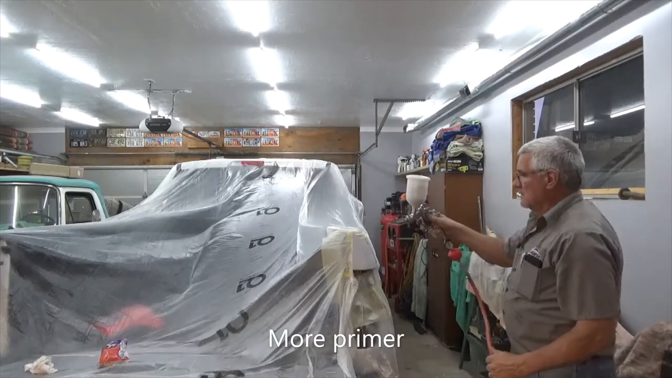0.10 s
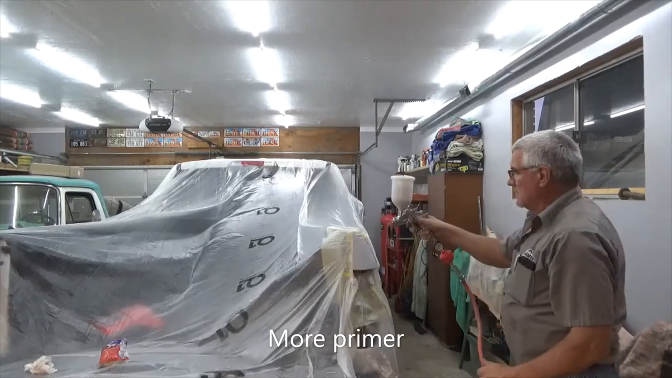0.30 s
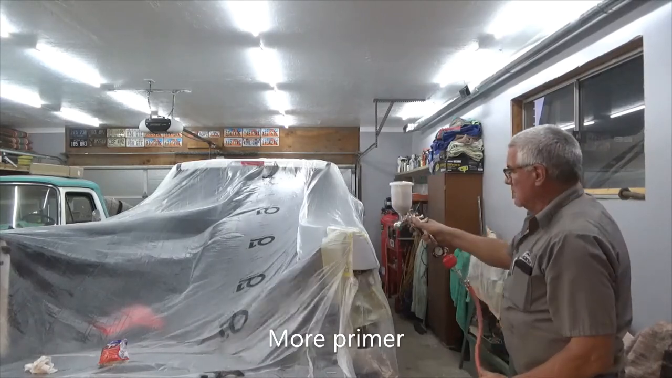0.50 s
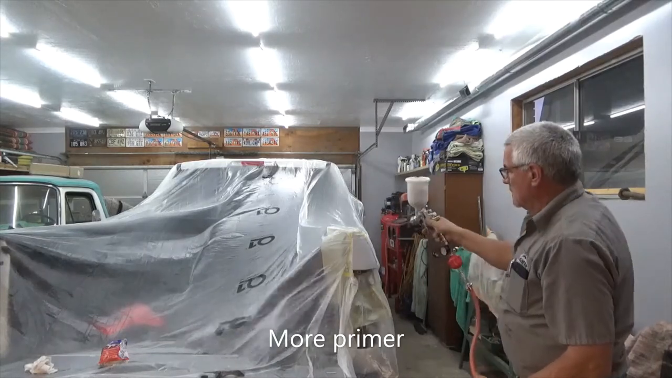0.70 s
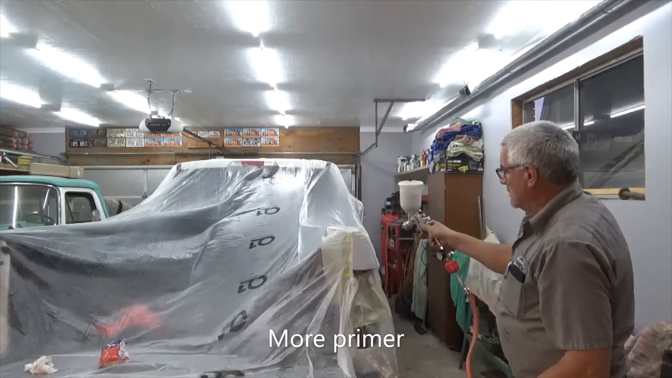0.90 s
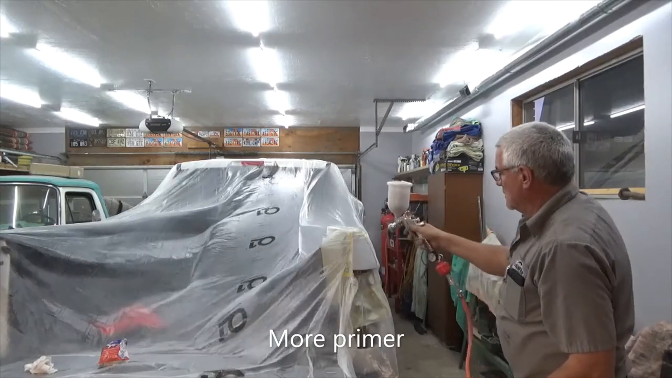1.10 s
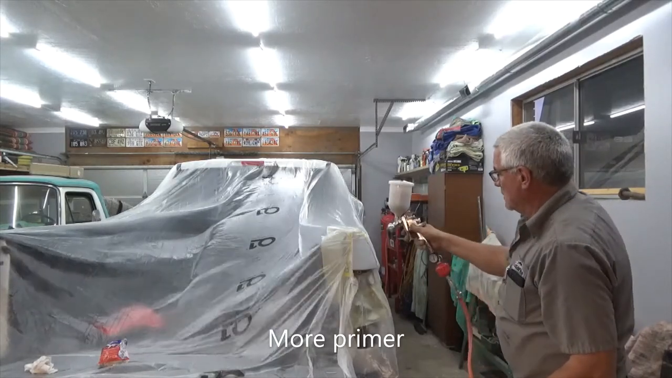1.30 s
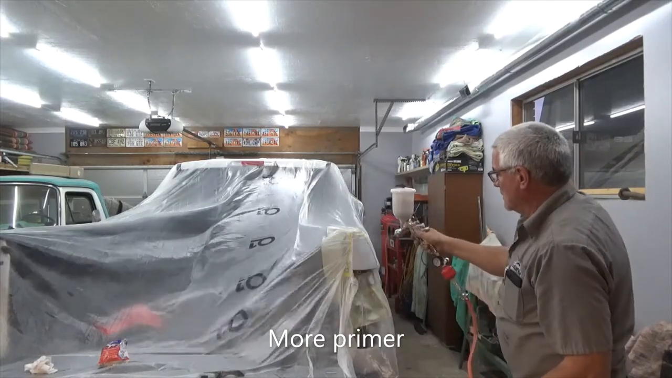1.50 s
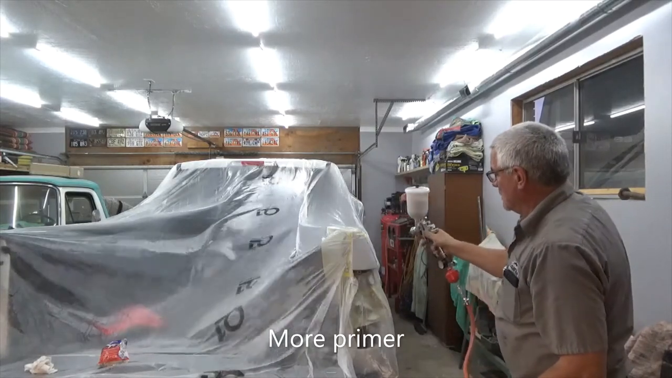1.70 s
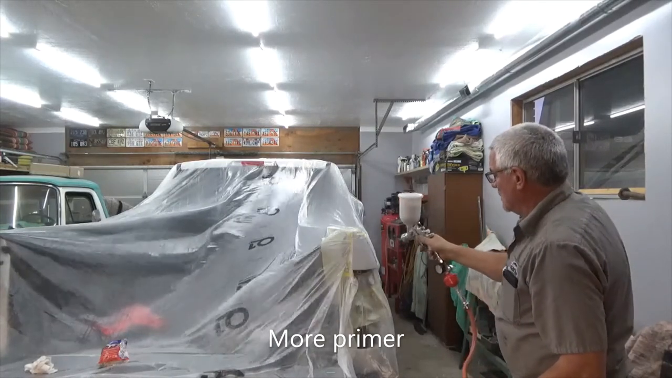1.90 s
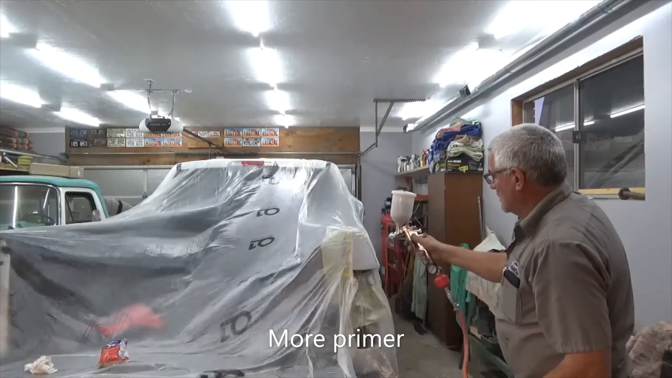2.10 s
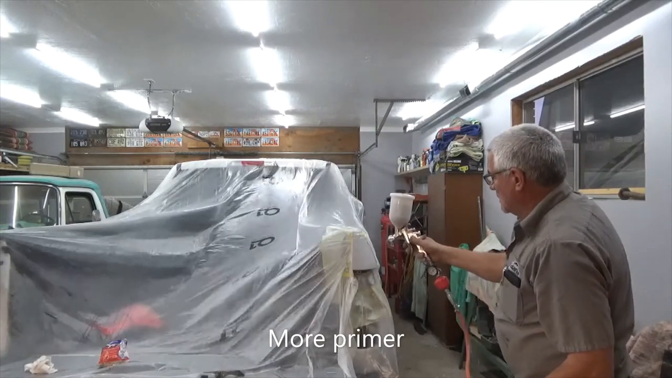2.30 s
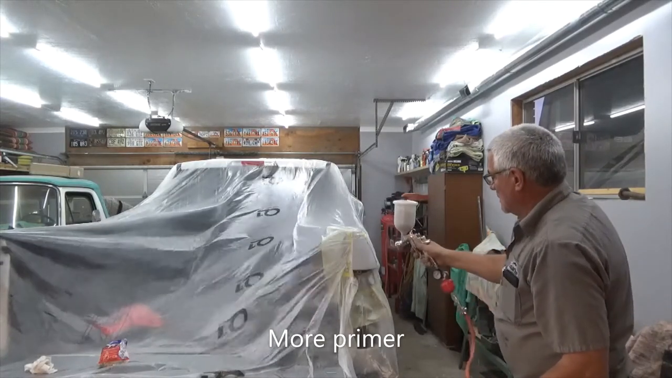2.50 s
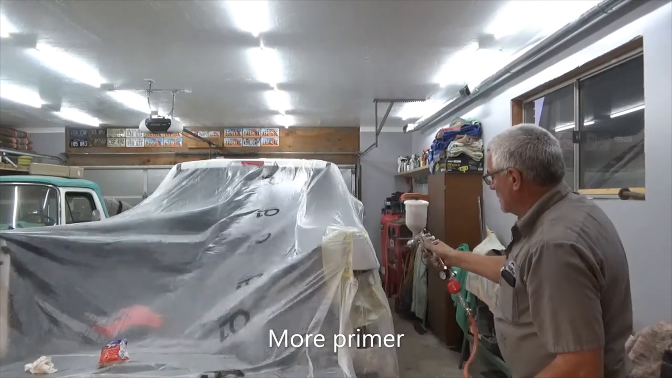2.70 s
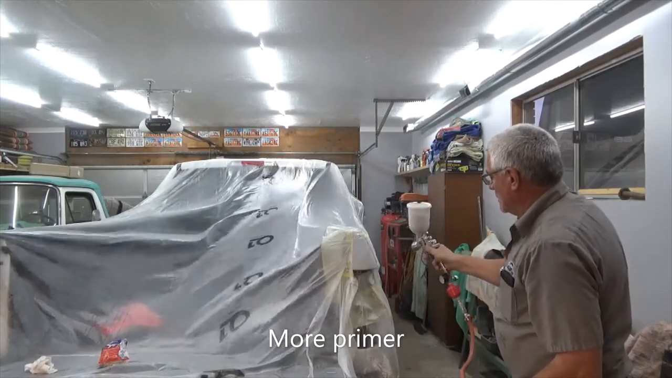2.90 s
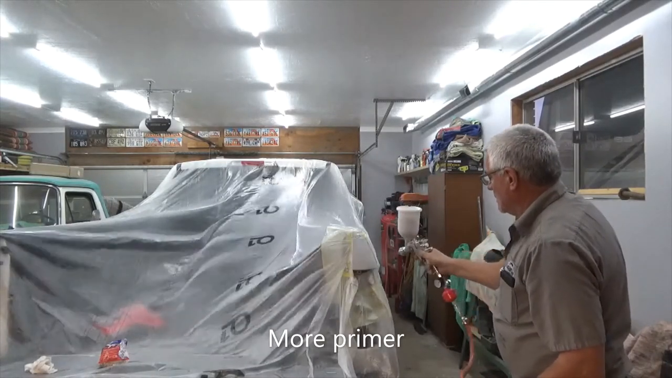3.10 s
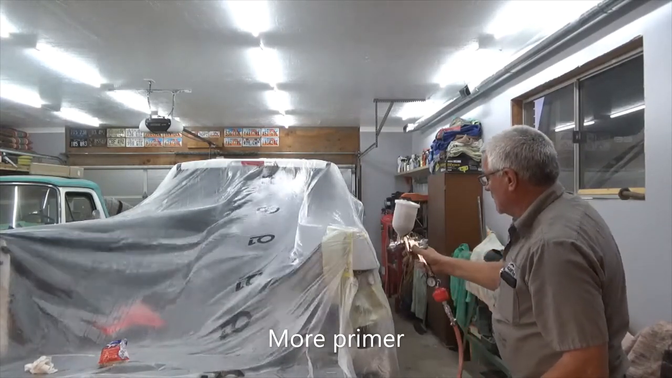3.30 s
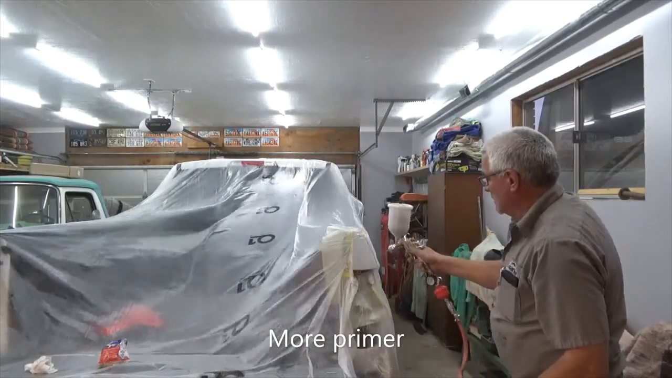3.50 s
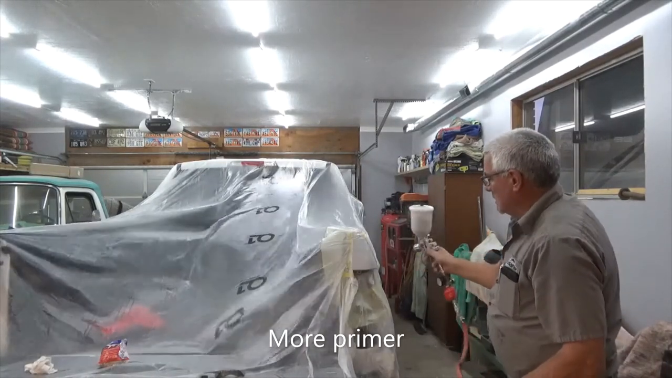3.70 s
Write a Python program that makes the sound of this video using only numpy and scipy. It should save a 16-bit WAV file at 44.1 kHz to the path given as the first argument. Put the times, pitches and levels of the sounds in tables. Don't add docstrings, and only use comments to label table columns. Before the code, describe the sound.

A spray gun hisses seven times in a hard, reverberant garage, starting near 0.2, 0.8, 1.25, 1.75, 2.2, 2.85 and 3.35 seconds. Each burst lasts about a quarter to half a second: a sharp bright surge, a steadier treble jet, an abrupt stop and short room ring. A distant compressor rumbles throughout with wavering low hum and soft airy wash, ducked by the microphone's limiter at each surge.

```python
import sys
import numpy as np
from scipy import signal
from scipy.io import wavfile
from scipy.ndimage import uniform_filter1d

SR = 44100
rng = np.random.default_rng(int(sys.argv[2]) if len(sys.argv) > 2 else 0)


def nominal_scale(level):
    x = np.asarray(level, float) / 20
    return 10 ** x


def wrap_up_sound(samples):
    columns = np.atleast_2d(samples).T
    tamed = np.clip(columns, -1, 1)
    steps = np.round(tamed * 32767).astype(np.int16)
    wavfile.write(sys.argv[1], SR, steps)


N = 171990

# (frequency [Hz], left-right likeness [0..1])
BACKGROUND_LIKENESS = [(60, 1.0), (170, 0.94), (490, 0.85), (1380, 0.52), (3930, 0.67), (11200, 0.71)]


def evened(x):
    return x / np.sqrt(np.mean(x ** 2) + 1e-20)


def read(points, hz):
    f, value = np.transpose(points)
    return np.interp(np.log(hz + 1), np.log(f + 1), value)


def noise(colour, likeness, patchy_db, flicker_db, size):
    hop = size // 4
    frames, hz = N // hop + 5, np.fft.rfftfreq(size, 1 / SR)
    a, b, c, d, patches, flicker = rng.standard_normal((frames, len(hz), 6)).T
    patches = uniform_filter1d(patches, size=6, axis=0)
    patches = evened(uniform_filter1d(patches, size=12, axis=1))
    flicker = evened(uniform_filter1d(flicker, size=60, axis=0))

    same = np.clip(read(likeness, hz), -1, 1)[:, None]
    left, other = a + 1j * b, c + 1j * d
    right = same * left + np.sqrt(1 - same ** 2) * other

    below = 12 * np.minimum(np.log2((hz + 1) / colour[0][0]), 0)
    level_db = (read(colour, hz) + below)[:, None] + patchy_db * patches + flicker_db * flicker
    spectra = np.array([left, right]) * nominal_scale(level_db)
    return evened(signal.istft(spectra, nperseg=size, noverlap=size - hop)[1][:, :N])


def fuzzy(hz, width):
    r, t = np.exp(-np.pi * width / SR), np.arange(N) / SR
    z = rng.standard_normal(N + SR) + 1j * rng.standard_normal(N + SR)
    slow = signal.lfilter([1], [1, -2 * r, r * r], z)[SR:]
    return evened((slow * np.exp(2j * np.pi * hz * t)).real)


def valve(t, opened, shut):
    open_s, open_db, shut_s = .015, 44, .012
    opening = nominal_scale(open_db * (np.minimum((t - opened) / open_s, 1) - 1))
    closing = np.clip(1 - (t - shut) / shut_s, 0, 1)
    return (t > opened) * opening * closing


def spray_gun():
    # (open [s], shut [s], jet level [dB], drift over the pull [dB])
    pulls = [
        (0.22, 0.569, -19.5, 0),
        (0.817, 1.127, -21, 1.5),
        (1.25, 1.6, -21, 0.5),
        (1.758, 2.113, -21.5, 3.5),
        (2.227, 2.703, -20.5, -0.5),
        (2.854, 3.22, -21.5, 3.5),
        (3.344, 3.592, -20, -2),
    ]
    # (frequency [Hz], level [dB per Hz])
    jet_colour = [(350, -50), (600, -20.5), (875, -24), (1020, -19), (1480, -15), (5110, -6), (8020, -1.5),
                  (9160, -1), (11000, -6.5), (14300, -37), (22000, -120)]
    # (frequency [Hz], level [dB per Hz])
    surge_colour = [(530, -70), (900, -16.5), (1570, -19), (1910, -13), (4710, -4.5), (7390, 4.5),
                    (11000, 3.5), (14300, 6), (22000, -120)]
    # (frequency [Hz], left-right likeness [0..1])
    gun_likeness = [(700, 1), (1500, 0.98), (4000, 0.94), (8000, 0.97), (11000, .98)]
    surge_db, surge_hold_s, surge_sag_s = 12, .046, .018

    t, flow, surge = np.arange(N) / SR, np.zeros(N), np.zeros(N)
    for opened, shut, jet_db, drift_db in pulls:
        gate = valve(t, opened, shut)
        progress = np.clip((t - opened) / (shut - opened), 0, 1)
        flow += gate * nominal_scale(jet_db + drift_db * progress ** 2)
        sag = np.exp(-np.maximum(t - opened - surge_hold_s, 0) / surge_sag_s)
        surge += gate * nominal_scale(jet_db + surge_db) * sag

    jet_hiss = flow * noise(jet_colour, gun_likeness, 1.2, 0.76, size=256)
    surge_hiss = surge * noise(surge_colour, gun_likeness, 1.2, 1.4, size=256)
    return jet_hiss + surge_hiss


def early_echoes():
    # (delay [s], left level [dB], right level [dB])
    bounces = [(.0013, -20, -21), (.0034, -21, -20), (.0059, -22, -23), (.0097, -23, -22),
               (.0141, -24, -24)]
    early = np.zeros((2, 1000))
    early[:, 0] = 1
    for s, left_db, right_db in bounces:
        early[:, round(s * SR)] = nominal_scale(left_db), nominal_scale(right_db)
    return early


def room_tail():
    # (frequency [Hz], time to fall 60 dB [s])
    decay = [(500, 0.86), (1500, 0.72), (4000, 0.53), (8000, 0.35), (11000, 0.29)]
    # (frequency [Hz], left-right likeness [0..1])
    tail_likeness = [(1000, 0.55), (3000, 0.63), (8000, 0.74), (11000, 0.82)]
    far_db, far_t60_s = -28.5, 1.26

    taps = np.zeros((2, SR))
    at = np.arange(300, SR - 20, 20) + rng.integers(0, 20, (2, (SR - 301) // 20))
    np.put_along_axis(taps, at, rng.choice([-1., 1.], at.shape), 1)

    hz, lag, z = signal.stft(taps, SR, nperseg=256)
    same = np.clip(read(tail_likeness, hz), 0, 1)[:, None]
    z = np.array([z[0], same * z[0] + np.sqrt(1 - same ** 2) * z[1]])
    near_fall = nominal_scale(-60 * lag / read(decay, hz)[:, None])
    far_fall = nominal_scale(far_db - 60 * lag / far_t60_s)
    tail = signal.istft(z * (near_fall + far_fall), SR, nperseg=256)[1]
    return tail / np.linalg.norm(tail[0])


def garage(x):
    sway_s = .03
    room_db = -1.5
    reverb, t = np.zeros_like(x), np.arange(N) / SR
    for k in range(6):
        turn = np.sqrt(2 / 6) * np.cos(np.pi / 6 * (t / sway_s + k))
        reverb += signal.fftconvolve(x * turn, room_tail(), axes=1)[:, :N]
    direct = signal.oaconvolve(x, early_echoes(), axes=1)[:, :N]
    return direct + nominal_scale(room_db) * reverb


def stroke_tones():
    # (multiple of the stroke rate, level [dB], width [Hz])
    strokes = [(1, -51, 4.8), (2, -46.5, 3.2), (4, -55.5, 7.4), (5, -52, 11), (6, -58, 14)]
    stroke_hz = 58.55
    return sum(nominal_scale(db) * fuzzy(k * stroke_hz, width) for k, db, width in strokes)


def room_booms():
    # (frequency [Hz], width [Hz], level [dB])
    modes = [(41, 3.3, -63), (83.2, 8, -67), (117.2, 24.3, -42.5), (132.4, 30, -46), (164, 6, -58.5),
             (210.2, 5.8, -61), (280, 17, -59), (325, 7.9, -59), (379, 9.9, -58.5), (413.3, 6.1, -55.5),
             (470.7, 18.5, -55), (514.5, 7.2, -60.5), (578.5, 13.5, -57)]
    side_db = -21
    centre = sum(nominal_scale(db) * fuzzy(hz, width) for hz, width, db in modes)
    spread = sum(nominal_scale(db) * fuzzy(hz, width) for hz, width, db in modes[2:])
    return centre + nominal_scale(side_db) * np.array([[1], [-1]]) * spread


def compressor():
    # (frequency [Hz], level [dB per Hz])
    rumble_colour = [(15, -29), (25, -37.5), (107, 8.5), (146, -12.5), (356, -5.5), (1200, -26.5),
                     (1560, -55), (2640, -120)]
    # (time [s], level [dB])
    effort = [(0, 0.3), (.4, .1), (.75, 1.7), (1.1, -0.5), (1.5, -1.5), (1.9, -1.1), (2.3, -0.6),
              (2.7, -0.5), (3.0, -0.4), (3.3, 1.5), (3.6, 0), (3.9, -0.5)]
    rumble = nominal_scale(-40) * noise(rumble_colour, BACKGROUND_LIKENESS, 2.2, .8, size=1024)
    rumble = rumble * nominal_scale([[.4], [-.4]])
    load = nominal_scale(np.interp(np.arange(N) / SR, *np.transpose(effort)))
    return load * (rumble + stroke_tones() + room_booms())


def air_wash():
    # (frequency [Hz], level [dB per Hz])
    air_colour = [(410, -39), (700, -5), (842, -5), (871, -6), (1020, -4.5), (1460, -7), (4530, -15.5),
                  (8250, -13.5), (11000, -19), (14300, -58), (22000, -120)]
    return nominal_scale(-44.5) * noise(air_colour, BACKGROUND_LIKENESS, 1.1, 0.34, size=512)


def scene():
    return nominal_scale(-1.0) * garage(spray_gun()) + compressor() + air_wash()


def limiter(x):
    knee_db, slope, recover_db_per_s = -16.5, .95, 380
    sense_s, lead_s = .003, .001
    r = np.exp(-1 / (sense_s * SR))
    power = signal.lfilter([1 - r], [1, -r], (x ** 2).mean(0))
    power_db = 10 * np.log10(power + 1e-12)
    fall = np.arange(N) * recover_db_per_s / SR
    held_db = np.maximum.accumulate(power_db + fall) - fall
    over_db = np.maximum(held_db - knee_db, 0)
    smooth_db = uniform_filter1d(over_db, size=150)
    return x / nominal_scale(slope * np.roll(smooth_db, -round(lead_s * SR)))


def band_limit(x):
    return signal.sosfilt(signal.butter(12, 11780, fs=SR, output="sos"), x)


def record(dry):
    low_pass = signal.firwin(701, 11000, window=("kaiser", 9), fs=SR)
    mix = signal.oaconvolve(limiter(dry), low_pass[None], "same")
    return band_limit(mix)


dry = scene()
out = record(dry)
wrap_up_sound(out)
```